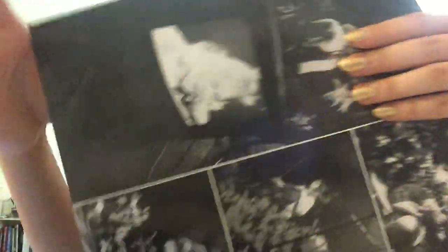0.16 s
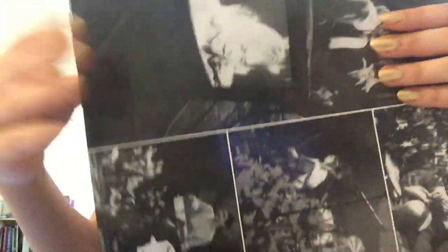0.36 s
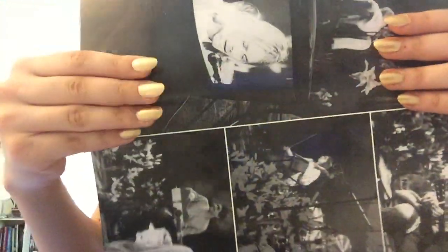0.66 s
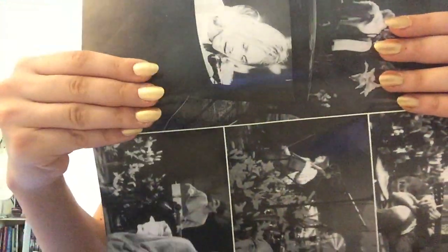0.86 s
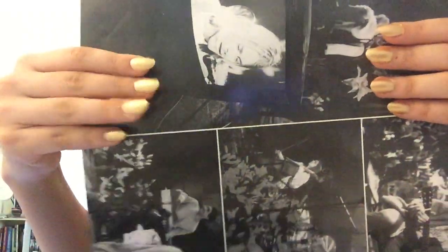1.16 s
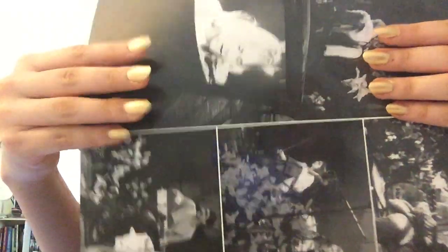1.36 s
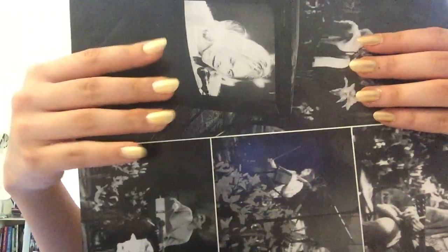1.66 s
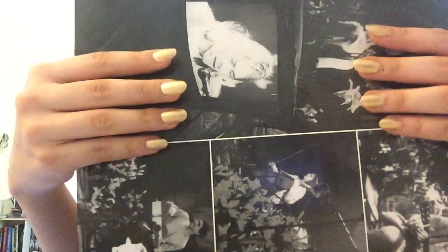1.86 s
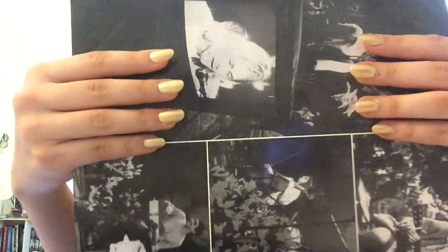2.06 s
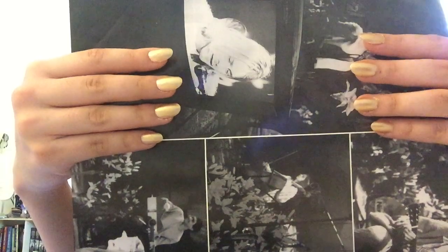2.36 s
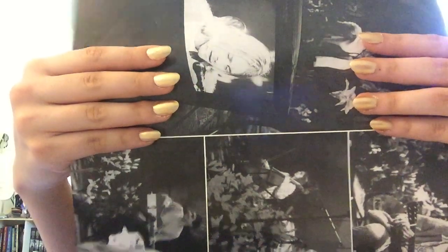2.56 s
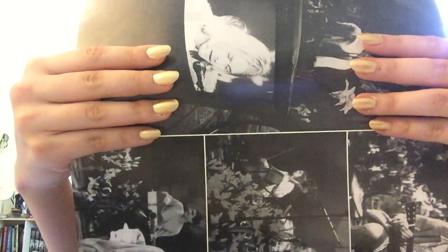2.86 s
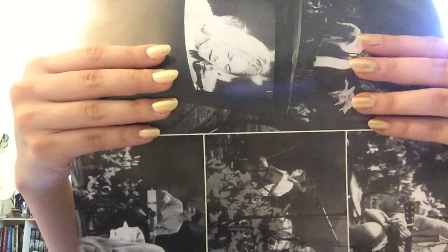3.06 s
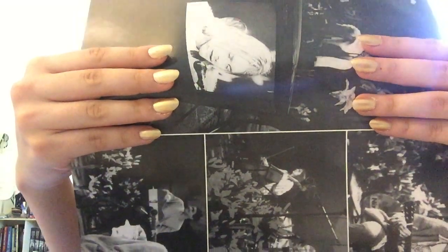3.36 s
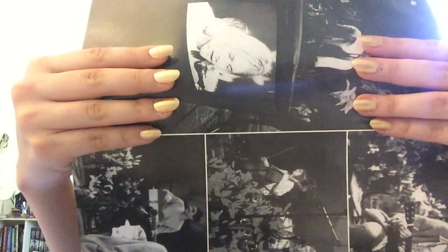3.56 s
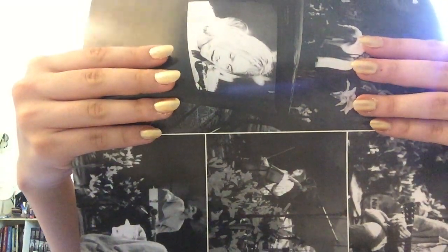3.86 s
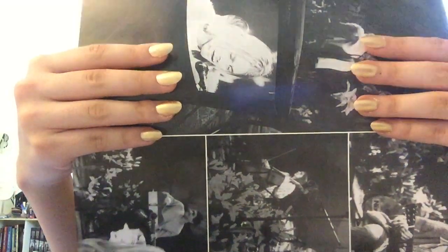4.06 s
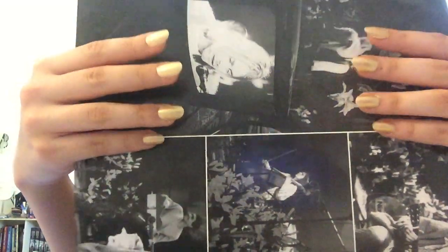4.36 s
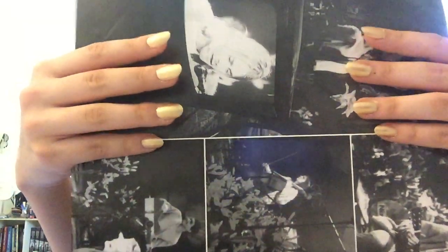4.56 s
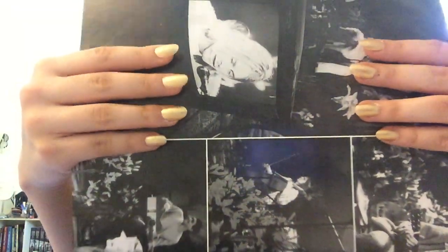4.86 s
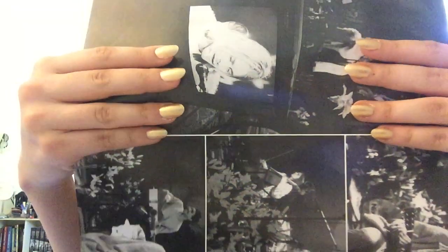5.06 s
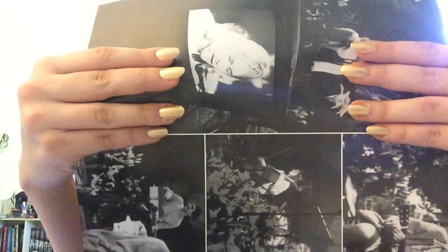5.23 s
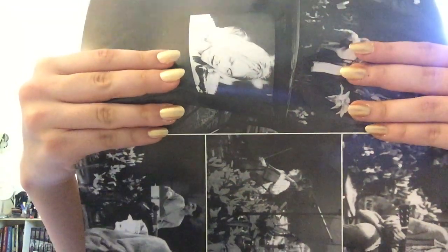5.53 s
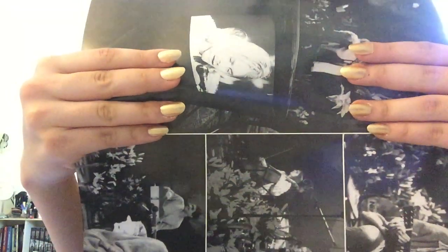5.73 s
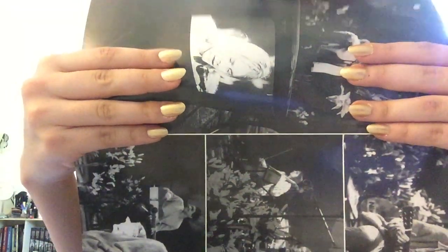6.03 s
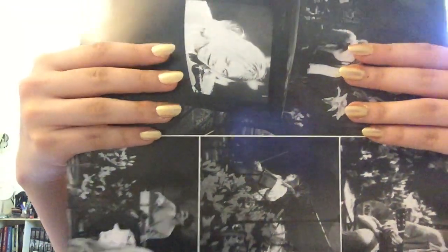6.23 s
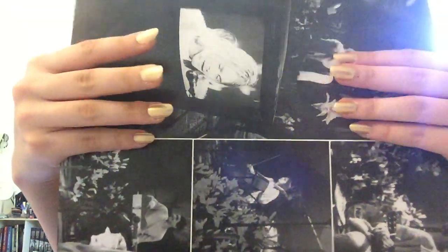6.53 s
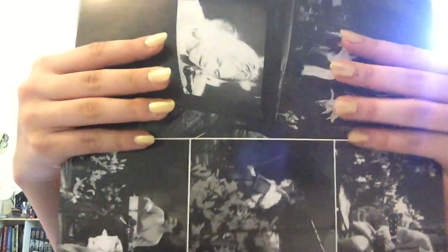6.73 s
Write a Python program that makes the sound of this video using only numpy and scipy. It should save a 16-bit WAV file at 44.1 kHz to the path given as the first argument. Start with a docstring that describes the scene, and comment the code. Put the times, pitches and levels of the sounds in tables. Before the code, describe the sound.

Fingers shift on a large stiff paper sheet, ticking and rubbing, then it pops sharply; distant birds twitter and whistle faintly.

```python
"""A stiff paper poster is held close to the microphone in a small, quiet room with mains hum and soft noise.
First the flexing sheet rumbles, an edge is swiped with a bright hiss, and fingertips thump and nails tick.
The hands slide and press three times, with friction noise and small crease ticks; far birds twitter as echo.
Once the sheet buckles with a loud snap of ringing modes, shudders and echoes off a wall as a tick; then birds
call and whistle as gliding sines. Noise bursts and decaying modes make the paper; a noise tail the room."""
import sys
import numpy as np
from scipy import signal
from scipy.fft import rfft, irfft
from scipy.io import wavfile

SR = 44100
rng = np.random.default_rng(int(sys.argv[2]) if len(sys.argv) > 2 else 0)


def transcribe(signal):
    """Save signal, clipped to [-1, 1], as a 16-bit WAV file at the path in sys.argv[1]."""
    frames = np.atleast_2d(signal).T
    limited = np.clip(frames, -1, 1)
    pcm = np.round(limited * 32767).astype(np.int16)
    wavfile.write(sys.argv[1], SR, pcm)


N = 303849
TIME = np.arange(N) / SR
SNAP_S = 2.5628   # the moment the sheet pops through


def from_db(db):
    """Decibels to gain."""
    return 10 ** (np.asarray(db) / 20)


def at_hz(points, hz, axis=1):
    """One column of a spectrum, read on a log-frequency axis."""
    table = np.array(points, float)
    return np.interp(np.log(np.maximum(hz, 1)), np.log(table[:, 0]), table[:, axis])


def add(track, s, sound):
    """Mix a short sound into a track at time s."""
    start = round(s * SR)
    track[start:start + len(sound)] += sound[:N - start]


def unit_energy(x):
    """Scale to a summed square of 1."""
    return x / np.sqrt(np.sum(x ** 2) + 1e-20)


def low_pass(x, edge_hz, order=2):
    """Causal Butterworth low-pass."""
    return signal.sosfilt(signal.butter(order, edge_hz, fs=SR, output="sos"), x + 1e-18)


def colour(x, spectrum, size=8192):
    """Causal (minimum-phase) filter with the given gains."""
    gains = from_db(at_hz(spectrum, np.fft.rfftfreq(size, 1 / SR)))
    # folding the cepstrum onto positive times puts the response at its earliest
    cepstrum = irfft(np.log(gains))
    cepstrum[1:size // 2] *= 2
    cepstrum[size // 2 + 1:] = 0
    response = irfft(np.exp(rfft(cepstrum)))
    return signal.fftconvolve(x, response)[:N]


def ring(x, hz, t60):
    """A unit click sets a sine of height 1 ringing; it falls by 60 dB in t60 seconds."""
    r, w = np.exp(-np.log(1000) / (t60 * SR)), 2 * np.pi * hz / SR
    return signal.lfilter([0, np.sin(w)], [1, -2 * r * np.cos(w), r * r], x + 1e-18)


def drift(rate):
    """Random values, rate per second, joined by straight lines; spread just under 1."""
    return np.interp(TIME * rate, np.arange(N), rng.standard_normal(N))


def fade(rows):
    """Gain along a level curve, silent outside it."""
    s, db = np.transpose(rows)
    return from_db(np.interp(TIME, s, db)) * (TIME > s[0]) * (TIME < s[-1])


def envelope(start_s, end_s, attack_s, release_s):
    """Rise, hold, then die away."""
    rise = np.clip((TIME - start_s) / attack_s, 0, 1)
    return rise * np.exp(-np.maximum(TIME - end_s, 0) / release_s)


def background(waver_db=1):
    """Soft coloured room noise, with a low hum and a faint electronic whine that waver in level."""
    # steady tones: pitch_hz, rms_db
    steady_tones = [(59.2, -68.5), (10374, -92)]
    # colour of the room noise: pitch_hz, gain_db
    noise_colour = [(20, -47), (45, -55), (100, -52), (170, -56.5), (300, -62.5), (700, -64), (1500, -70),
                    (2600, -70.5), (5000, -73), (16000, -74.5)]
    hum = np.zeros(N)
    for hz, db in steady_tones:
        gain = np.sqrt(2) * from_db(db + waver_db * drift(15))
        hum += gain * np.sin(2 * np.pi * hz * TIME)
    return hum + colour(rng.standard_normal(N), noise_colour)


def handling():
    """Gains of the skin's hiss and the sheet's rumble as the hands slide, press and rest; powers add."""
    # a hand shifts its grip, sliding and then pressing down: start_s, press_s, slide_db, press_db
    grip_shifts = [(1.034, 1.358, -61, -55), (3.985, 4.284, -66, -51.5), (6.008, 6.456, -61, -60.5)]
    # the sheet flexes under resting fingers: start_s, end_s, rumble_db
    flexes = [(0.0, 0.226, -63.5), (.33, 0.54, -73.5), (1.518, 1.66, -65.5), (1.735, 1.853, -64.5),
              (1.894, 2.108, -69), (4.456, 4.637, -69), (4.78, 4.823, -65), (4.899, 4.974, -62),
              (5.341, 5.56, -73), (6.514, 6.882, -67.5)]
    slide_attack_s, slide_release_s = 0.063, 0.021
    # as the fingers bear down, the hiss sags and the sheet's rumble grows
    hiss_sag_db_per_s, rumble_rise_db_per_s, rumble_start_db = 18, 22, -9
    press_attack_s, press_release_s = 0.033, 0.016
    press_rumble_db, press_rumble_release_s = 1.5, 0.072
    flex_attack_s, flex_release_s, flex_hiss_db = 0.005, 0.033, -20.5

    hiss, rumble = np.zeros((2, N))
    for start_s, press_s, slide_db, press_db in grip_shifts:
        age = np.clip(TIME - start_s, 0, press_s - start_s)
        slide = from_db(slide_db) * envelope(start_s, press_s, slide_attack_s, slide_release_s)
        hiss += (slide * from_db(-hiss_sag_db_per_s * age)) ** 2
        rumble += (slide * from_db(rumble_start_db + rumble_rise_db_per_s * age)) ** 2
        lean_s = press_s - press_attack_s
        press = envelope(lean_s, press_s, press_attack_s, press_release_s)
        press_shake = envelope(lean_s, press_s, press_attack_s, press_rumble_release_s)
        hiss += (from_db(press_db) * press) ** 2
        rumble += (from_db(press_db + press_rumble_db) * press_shake) ** 2
    for start_s, end_s, level_db in flexes:
        flex = from_db(level_db) * envelope(start_s, end_s, flex_attack_s, flex_release_s)
        hiss += (from_db(flex_hiss_db) * flex) ** 2
        rumble += flex ** 2
    return np.sqrt(hiss), np.sqrt(rumble)


def sliding(hiss, rumble, slip_db=-4, fine_db=-2, shake_db=-1, uneven_db=2.5, swell_db=1.5):
    """Skin sticks and slips: a fine hiss with coarser crackles, while the sheet rumbles under the hand."""
    # colours of the friction and of the shaken sheet: pitch_hz, gain_db
    hiss_colour, rumble_colour = [(300, -7), (800, 13.5), (1300, 7), (1800, -6.5), (2700, 2.5), (4500, -2),
                                  (6200, 1.5), (7500, -1.5), (11000, 5), (16000, -3)], [(25, 24.5), (90, 24.5), (170, 18.5), (500, 11),
                                                (1000, -0.5), (1300, -3), (1800, -7), (4000, -13.5)]
    slips_per_s, slip_spread_db = 900, 3.8
    sizes = from_db(slip_spread_db * np.minimum(rng.exponential(1, N), 4)) * rng.choice([-1, 1], N)
    slips = unit_energy(sizes * (rng.random(N) < slips_per_s / SR)) * np.sqrt(N)   # rms 1
    grip_db = uneven_db * drift(120) + swell_db * drift(30)
    friction = from_db(slip_db) * slips + from_db(fine_db) * rng.standard_normal(N)
    shaking = rng.standard_normal(N) * from_db(2 * grip_db + shake_db)
    rub = friction * hiss * from_db(grip_db)
    return colour(rub, hiss_colour) + patches(rub) + colour(shaking * rumble, rumble_colour)


def patches(rub):
    """Each paper resonance comes and goes at random as the finger travels over the paper."""
    # resonances under a moving finger: pitch_hz, width_hz, level_db (relative to the trim)
    rub_resonances = [(1020, 350, 4), (2830, 650, 0.5), (5900, 900, -3)]
    trim_db, wander_db, wander_per_s = -7.5, 4.5, 30
    out = np.zeros(N)
    for hz, width_hz, level_db in rub_resonances:
        b, a = signal.iirpeak(hz, hz / width_hz, fs=SR)
        gain = from_db(level_db + trim_db + wander_db * drift(wander_per_s))
        out += signal.lfilter(b, a, rub * gain + 1e-18)
    return out


def swipe():
    """One fast stroke along the edge gives a smooth, bright hiss of shaped noise."""
    # loudness of the stroke: time_s, level_db
    stroke = [(.007, -57), (.011, -52.5), (.035, -52), (.067, -47.5), (.074, -68), (.085, -82)]
    # its colour: pitch_hz, gain_db
    stroke_colour = [(500, 3), (1800, -20), (3600, 0.5), (5600, -1), (6500, 3.5), (7200, -1.5), (8900, -6),
                     (10200, 7), (11400, 1), (12700, 1.5), (14100, -4), (16000, -7)]
    return colour(rng.standard_normal(N) * fade(stroke), stroke_colour)


def creases(hiss, size=1024):
    """Small creases give way at uneven intervals, their ticks tracking the hiss; rows for ticks()."""
    creases_per_s, level_over_hiss_db, spread_db = 40, 18.5, 3.5
    brightness_db, weight_db = 4, -4
    chance = rng.random((size, 3))
    times = np.cumsum(.5 + chance[:, 0]) / creases_per_s
    scatter_db = spread_db * np.sqrt(12) * (chance[:, 1:] - .5)
    rows = []
    for s, (size_db, tone_db) in zip(times, scatter_db):
        if s < TIME[-1]:
            hiss_db = 20 * np.log10(hiss[int(s * SR)] + 1e-9)
            rows.append((s, hiss_db + level_over_hiss_db + size_db, brightness_db + tone_db, weight_db))
    return rows


def crack(decay_s, size=400):
    """Paper fibres give way in a noise burst that dies within milliseconds; energy 1."""
    return unit_energy(rng.standard_normal(size) * np.exp(-TIME[:size] / decay_s))


def spike(burst_share, size=400):
    """A sharp spike with a noise burst behind it; energy about 1."""
    burst = crack(decay_s=.0008)
    return np.sqrt(burst_share) * burst - np.sqrt(1 - burst_share) * signal.unit_impulse(size)


def ticks(rows, push_s=0.00008, rasp_db=-13, size=400):
    """A brief rasp, then release: a bright crack, a hollow click and a one-sided push of air."""
    # colours of crack and click: pitch_hz, gain_db
    crack_colour, click_colour = [(1500, -20), (3000, -12), (4900, -1), (5500, 8), (6700, 0), (9000, 0.5),
                                  (13000, 2), (16000, -9.5)], [(500, 2), (1300, -21.5), (1800, 7), (2450, 14), (3000, 5),
                                                 (3500, 11), (4600, 0), (8000, -8.5)]
    cracks, clicks, pushes = np.zeros((3, N))
    age = TIME[:size] / push_s
    for s, click_db, brightness_db, weight_db in rows:
        drag = from_db(rasp_db) * crack(decay_s=.003)[::-1]   # grows towards the release
        layers = (cracks, click_db + brightness_db, .6), (clicks, click_db, .35)
        for track, level_db, burst_share in layers:
            add(track, max(s - size / SR, 0), from_db(level_db) * drag)
            add(track, s, from_db(level_db) * spike(burst_share))
        add(pushes, s, -from_db(click_db + weight_db) * age * np.exp(1 - age))
    return colour(cracks, crack_colour) + colour(clicks, click_colour) + pushes


def thumps(rows, swell_s, sway_db, size=4096, length_s=0.0065, sway_hz=110, dent_db=-4):
    """A soft contact dents the sheet, shakes it briefly as low-passed noise and makes it sway."""
    out = np.zeros(N)
    sway = from_db(sway_db) * unit_energy(low_pass(signal.unit_impulse(size), sway_hz))
    age = TIME[:size] / swell_s
    for s, level_db, edge_hz in rows:
        flutter = low_pass(rng.standard_normal(size) * np.sqrt(age) * np.exp(-age), edge_hz, order=8)
        dent = low_pass(signal.unit_impulse(size), edge_hz, order=6)
        knock = unit_energy(unit_energy(flutter) - from_db(dent_db) * unit_energy(dent))
        # the knock's level is its rms if spread over length_s
        add(out, s, from_db(level_db) * np.sqrt(length_s * SR) * (knock - sway))
    return out


def fingertips():
    """Landing fingertips thump softly and sway the whole sheet more than a nail does."""
    # a fingertip lands or the sheet gives: start_s, level_db, upper_edge_hz
    landings = [(.090, -48, 860), (.553, -48.5, 463), (.566, -39.5, 850), (.596, -54, 1010),
                (.630, -46, 460), (.678, -46, 1120), (.695, -45.5, 580), (.742, -44, 597),
                (1.283, -49.5, 706), (1.834, -59, 573), (2.036, -53.5, 640), (2.323, -51, 103),
                (4.174, -49.5, 890), (4.275, -44.5, 1090), (4.522, -53, 121), (4.911, -49, 840),
                (5.153, -61.5, 724), (6.337, -47.5, 1120), (6.722, -43, 1070), (6.859, -40, 1220)]
    return thumps(landings, swell_s=0.0052, sway_db=-5)


def nails_and_wall_echo():
    """Nails, and once the snap's echo off a wall, each give a tick and a knock according to weight."""
    # a nail catches on the paper; the tick at 2.602 s is the snap's echo off a wall:
    # time_s, click_db, brightness_db (over click), weight_db (over click)
    sharp_sounds = [(0.1295, -38.5, 4, -18), (0.5453, -38, 2, -9), (.5519, -41.5, 2, 0),
                    (0.6319, -50.5, 12, -1), (1.0605, -39, 10.5, -6), (1.1429, -37.5, 15.5, 5),
                    (1.157, -40, 5, -3.5), (1.1939, -25.5, 11.5, -8.5), (1.3514, -31, 0, -10),
                    (1.3585, -28, 1, -16), (1.3636, -20.5, 4, -5.5), (1.7395, -37, -2, -12),
                    (1.7739, -42, 5.5, -4.5), (1.7855, -45, 2, -8), (2.602, -40, 1.5, -14),
                    (4.069, -46.5, 16, -18), (4.1044, -36.5, 3, -16), (4.2318, -43.5, 5.5, -1),
                    (4.2481, -33, 2.5, -4.5), (4.2699, -21, -4, -17), (4.2843, -23, -6, -9.5),
                    (4.2914, -28, 0, -26), (4.3255, -26.5, 1, -12), (4.3926, -37.5, 5.5, -3.5),
                    (4.604, -46.5, -10, -3.5), (4.768, -41, -2, -12.5), (4.7856, -42.5, -4, -6),
                    (4.918, -41.5, -5, -5), (6.0849, -36.5, 3.5, -8.5), (6.146, -40, 10.5, -1),
                    (6.2646, -38, 4, -2.5), (6.3267, -27.5, 8.5, -9.5), (6.3821, -36.5, 6, -0.5),
                    (6.4033, -23.5, -3.5, -6.5), (6.4356, -34, -4, -16), (6.451, -26, 4.5, -8),
                    (6.4558, -23.5, 1.5, -6.5), (6.545, -36.5, -7, -6), (6.721, -43, -2, -8),
                    (6.866, -40.5, -0.5, -6)]
    knock_db, knock_edge_hz = -11.5, 1093   # the knock lies below the push
    knocks = [(s, click_db + weight_db + knock_db, knock_edge_hz)
              for s, click_db, _, weight_db in sharp_sounds]
    return ticks(sharp_sounds) + thumps(knocks, swell_s=0.0018, sway_db=-10.5)


def twitter(pitch_hz=6200, spread_hz=600, throb_db=4, count=5):
    """A far songbird: high sines of wandering pitch and level overlap into a faint shimmer."""
    # loudness of the shimmer: time_s, level_db
    shimmer = [(.25, -94), (.4, -81.5), (1.5, -80), (2.15, -84), (2.3, -95)]
    notes = np.zeros(N)
    for _ in range(count):
        pitch = pitch_hz + spread_hz * drift(83)
        notes += from_db(throb_db * drift(28.0)) * np.sin(2 * np.pi * np.cumsum(pitch) / SR)
    return fade(shimmer) * notes / np.sqrt(count)


def snap(level_db=-16, crack_db=-11, crack_delay_s=.0008, release_hz=9000):
    """The bowed patch flips over: its modes ring out at once and the crease cracks just after."""
    # fast modes of the buckling patch: pitch_hz, level_db (relative to the snap), t60_s
    patch_modes = [(82.5, -17, 0.1), (188, -7, 0.025), (547, 1, 0.012), (920, -8.5, 0.027),
                   (1240, -8, 0.028), (1680, -8, 0.014), (2317, -5.5, 0.023), (2680, -3.5, 0.0099),
                   (3317, -6.5, 0.013), (5584, -16.5, 0.011)]
    # colour of the crease's crack: pitch_hz, gain_db
    crease_colour = [(1000, -9.5), (4000, 11.5), (6500, 8.5), (8000, 14), (10000, 11.5), (12500, -5.5),
                     (16000, -32)]
    blow, crease, patch = np.zeros((3, N))
    add(blow, SNAP_S, np.ones(1))
    add(crease, SNAP_S + crack_delay_s, crack(decay_s=0.0016))
    blow = low_pass(blow, release_hz)
    for k, (hz, db, t60) in enumerate(patch_modes):
        patch += (-1) ** (k + 1) * from_db(db) * ring(blow, hz, t60)   # signs alternate
    return from_db(level_db) * (patch + from_db(crack_db) * colour(crease, crease_colour))


def shudder(level_db=-43, t60=0.42, size=16384):
    """After the snap, bending waves scatter at the sheet's edges: a decaying wash of noise."""
    # colour of the scattered waves: pitch_hz, gain_db
    wave_colour = [(150, -8.5), (600, 2.5), (1100, -0.5), (2000, -1.5), (4000, -13), (12000, -28)]
    out = np.zeros(N)
    decay = np.exp(-np.log(1000) * TIME[:size] / t60)
    add(out, SNAP_S, from_db(level_db) * rng.standard_normal(size) * decay)
    return colour(out, wave_colour)


def note(hz, length_s, arch, waver, count=24):
    """A bird's note swells and fades while its pitch arches and wavers."""
    along = np.linspace(0, 1, round(length_s * SR))
    wobble = np.interp(along, np.linspace(0, 1, count), rng.standard_normal(count))
    pitch = hz * (1 - arch * (2 * along - 1) ** 2 + waver * wobble)
    return np.sin(np.pi * along) * np.sin(2 * np.pi * np.cumsum(pitch) / SR)


def birds():
    """One far bird gives hoarse, falling two-note calls; another whistles thin, arched notes."""
    # two-note calls: start_s, first_hz, second_hz, level_db
    two_note_calls = [(3.029, 2650, 2300, -81), (3.58, 2600, 2330, -81.5), (4.331, 1990, 1840, -76),
                      (4.481, 2990, 2500, -76), (4.98, 3000, 1950, -76), (5.38, 3170, 2010, -77),
                      (5.77, 3090, 1950, -75)]
    # whistled notes: start_s, pitch_hz, level_db
    whistles = [(4.16, 7650, -71), (4.29, 7300, -74), (4.404, 7300, -67.5), (4.514, 7290, -63.5),
                (4.63, 7270, -65)]
    call = dict(length_s=.08, arch=.08, waver=.04)
    second_after_s, second_note_db = 0.062, -3.5
    out = np.zeros(N)
    for s, first_hz, second_hz, level_db in two_note_calls:
        add(out, s, from_db(level_db) * note(first_hz, **call))
        add(out, s + second_after_s, from_db(level_db + second_note_db) * note(second_hz, **call))
    for s, hz, level_db in whistles:
        add(out, s, from_db(level_db) * note(hz, length_s=.068, arch=0.038, waver=.004))
    return out


def sheet(x):
    """The held poster rings on in its slow modes, driven by the sound fed into it."""
    # slow modes of the whole sheet: pitch_hz, level_db, t60_s
    slow_modes = [(83, -67, .16), (149, -66.5, .13), (228, -66, .12), (362, -62, .12), (516.5, -51, .16),
                  (631, -49.5, 0.18), (731, -52.5, .15), (864, -55, .13), (972, -57, .13),
                  (1122, -57.5, 0.11), (1232, -55.5, 0.075), (1356, -56.5, 0.18), (2310, -69.5, 0.16)]
    return sum(from_db(db) * ring(x, hz, t60) for hz, db, t60 in slow_modes)


def room(x, first_echo_s=0.0063, size=16384):
    """A diffuse noise tail that dies away band by band."""
    # the room's echo: pitch_hz, level_db, t60_s
    echo_bands = [(60, -8.5, .15), (200, -7.5, .15), (550, -7.5, 0.14), (1200, -11.5, 0.15),
                  (2400, -19, .25), (5000, -17, .21), (14000, -19, .15)]
    edges = np.geomspace(30, 18000, 19)
    age, tail = TIME[:size] - first_echo_s, np.zeros(size)
    for low, high in zip(edges, edges[1:]):
        hz = np.sqrt(low * high)
        decay = np.exp(-np.log(1000) * age / at_hz(echo_bands, hz, axis=2))
        echoes = rng.standard_normal(size) * (age > 0) * decay
        band = signal.sosfilt(signal.butter(2, [low, high], "band", fs=SR, output="sos"), echoes)
        # energy in proportion to bandwidth, so the level is a gain
        tail += from_db(at_hz(echo_bands, hz)) * np.sqrt(2 * (high - low) / SR) * unit_energy(band)
    return signal.fftconvolve(x, tail)[:N]


def scene():
    """The paper is close and fairly dry; the birds arrive mostly as echo."""
    finger_damping_db, bird_echo_db = -5, 10.5
    hiss, rumble = handling()
    touches = sliding(hiss, rumble) + swipe() + ticks(creases(hiss)) + fingertips()
    touches += nails_and_wall_echo()
    buckle = snap()
    # a finger resting on the sheet damps the modes that it excites
    ringing = sheet(buckle + from_db(finger_damping_db) * touches)
    paper = touches + buckle + shudder() + ringing
    outside = twitter() + birds()
    echo = room(paper + from_db(bird_echo_db) * outside)
    return (paper + outside + echo + background())[None]


def record(dry):
    """A steep elliptic low-pass cuts off the very top."""
    cutoff_hz = 15900
    return signal.sosfilt(signal.ellip(12, .1, 80, cutoff_hz, fs=SR, output="sos"), dry)


dry = scene()
out = record(dry)
transcribe(out)
```